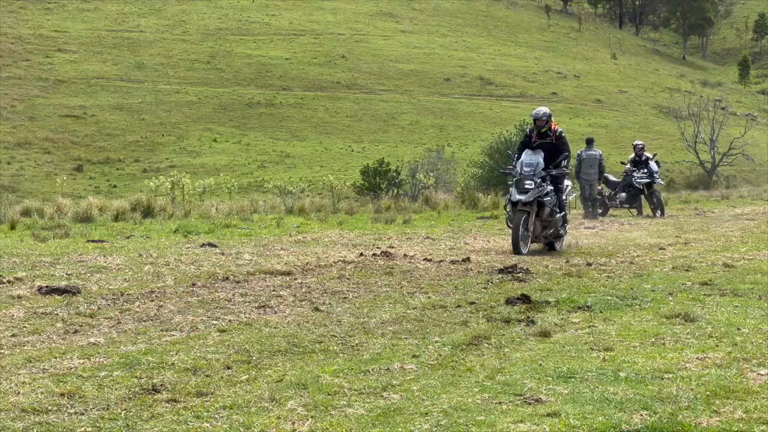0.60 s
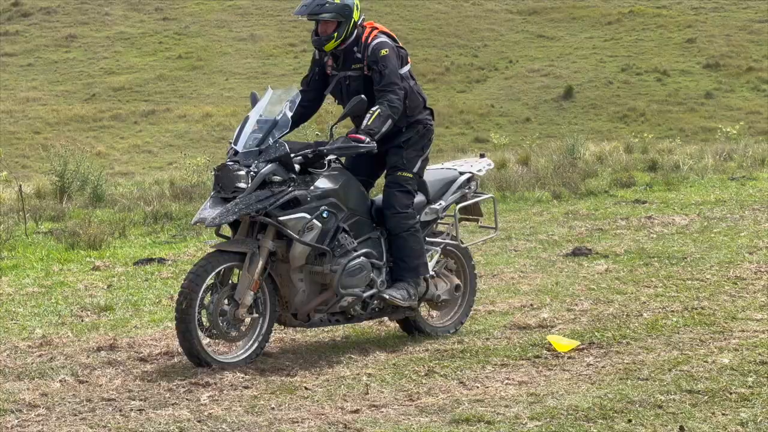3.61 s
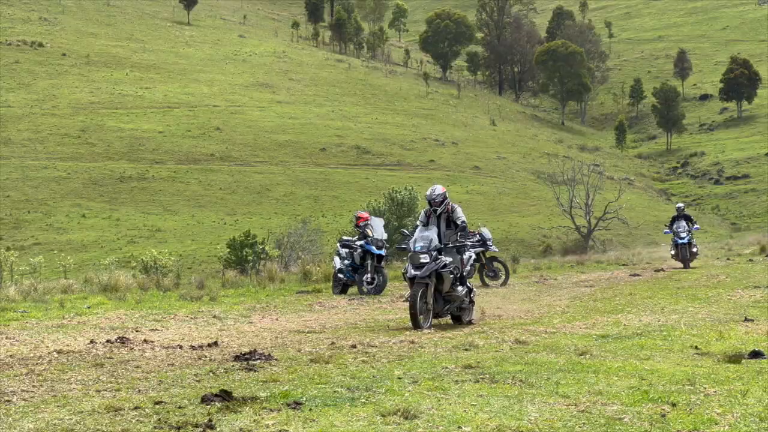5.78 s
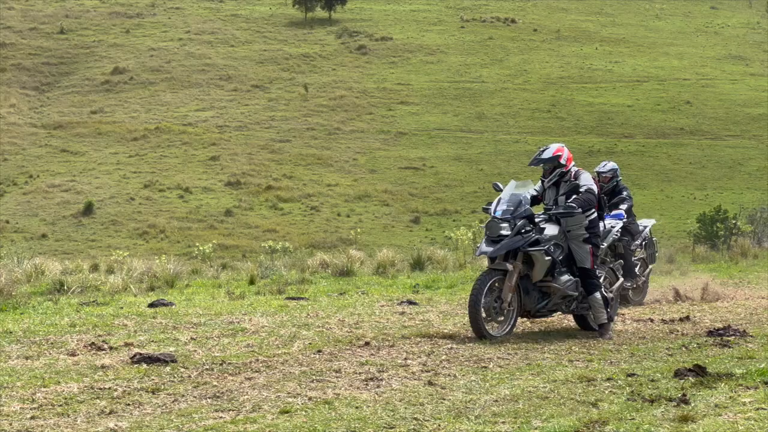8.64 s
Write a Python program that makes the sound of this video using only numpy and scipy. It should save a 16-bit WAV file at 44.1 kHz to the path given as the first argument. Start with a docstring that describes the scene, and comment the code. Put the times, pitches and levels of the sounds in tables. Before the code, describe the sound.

A twin-cylinder motorcycle thuds close to the microphone in an open field, its revs dropping from a quick burst to a low chug. The driveline knocks, valves clatter and gears whine. The rider blips the throttle twice and pulls away. After a brief fade, a second bike drones alongside, stones click under tyres, a brake squeaks and the revs rise again. Other engines rumble in the distance, and very short silences separate four passes.

```python
"""A motorcycle engine thuds close by, its revs falling from a quick burst to a low chug.
Twin-cylinder bikes are doing slow drills on a grass field, in four short passes with silent gaps.
The nearest lugs along with a knocking driveline, blips its throttle and pulls away; others run behind.
Each firing thuds through a silencer, under the clatter of valves and the whine of gears.
Metal rings faintly, small parts ping, and tyres scuff the turf and click on stones."""
import sys
import numpy as np
from scipy import signal
from scipy.fft import rfft, irfft
from scipy.io import wavfile
from scipy.ndimage import uniform_filter1d

SR = 44100
rng = np.random.default_rng(int(sys.argv[2]) if len(sys.argv) > 2 else 0)


def output_pcm(signal):
    """Save a mono or channel-first signal as 16-bit PCM at the path in sys.argv[1].

    Samples are clipped to [-1, 1] before scaling.
    """
    pcm = np.clip(np.atleast_2d(signal).T, -1, 1) * 32767
    wavfile.write(sys.argv[1], SR, np.round(pcm).astype(np.int16))


N = 413658
T = np.arange(N) / SR


# How strongly the silencer lets each pitch through: f/Hz, level/dB
SILENCER = [(18, -47.5), (28, -22), (37, -1.5), (47, 5), (65, 13.5), (85, 8.5), (110, 10), (135, 5.5),
            (160, -3), (190, -14.5), (225, -13.5), (260, -19.5), (320, -23.5), (400, -28), (550, -45.5),
            (3000, -120)]
def exhaust(turns, load, uneven, level_db, boom_top_hz=185, rasp_from_hz=291):
    """Firings ring the nearest bike's silencer; an open throttle adds bark and rasp above its boom."""
    bark_db, others_db, gulp, gulp_turns = np.array(PASSES)[pass_number(), 2:6].T
    # the intake gulps air about half a turn after each firing
    pulses = firings(turns, uneven) + gulp * firings(turns - gulp_turns, uneven)
    near = steadied(chamber(colour(pulses, SILENCER), hz=86, width_hz=140))
    around = other_bikes() + gain_of(-2) * echoes(near, decay_s=0.51, first_s=0.0073)
    pipes = near + gain_of(others_db - 18 * load) * evened(around)  # working hard, it stands out more
    pipes = signal.sosfilt(signal.butter(2, 15, "high", fs=SR, output="sos"), pipes)
    boom = below(pipes, boom_top_hz)
    bark = steadied(pipes - boom)
    # slow, uneven gas flow lingers in the chambers and rounds off each bark
    lingering = gain_of(-1) * uneven / uneven.mean() * echoes(bark, decay_s=0.13)
    bark = steadied(bark + lingering)
    body = below(bark, rasp_from_hz)
    rasp = gain_of(-11.5 + 17.5 * load ** 4) * (bark - body)
    return gain_of(level_db) * (steadied(boom) + gain_of(bark_db + 2 * load ** 2) * (body + rasp))


def firings(turns, uneven):
    """One pulse per engine turn; 'uneven' makes the two cylinders differ and each burn vary."""
    at = np.flatnonzero(np.diff(np.floor(turns)) > 0)
    strength, lag = rng.standard_normal((len(at), 2)).T
    cylinder = (-1) ** np.arange(len(at))
    size = np.exp(uneven[at] * (strength + 0.54 * cylinder))
    place = np.clip(at + .0018 * SR * uneven[at] * lag, 0, len(turns) - 1).astype(int)
    return np.bincount(place, size, len(turns))


# Twists of the throttle (1 Hz is one firing a second; load is how hard the engine works, 0 to 1):
# peak t/s, peak rate/Hz, climb/(Hz/s), sink/(Hz/s), settled rate/Hz, load
THROTTLE_TWISTS = [(0.1, 51.4, 6, 66.3, 26.5, 0.44), (0.72, 42.7, 8.1, 32, 23, 0.04),
                   (1.649, 24.9, 15.2, 6.1, 21.5, 0.07), (3.599, 31.5, 50, 23.9, 21.2, 0.43),
                   (4.079, 36.7, 54, 57.7, 21.2, 0.61), (4.691, 48.6, 88, 18.2, 36.5, 0.84),
                   (6.27, 47.3, 28, 40, 29, 0.64), (6.899, 30, 10, 9.34, 27, 0.2),
                   (8.85, 50.1, 25, 0.85, 48, 0.57), (9.17, 53, 21.4, 24, 47, 0.47)]
def throttle(flywheel_s=0.065, load_lag_s=0.12):
    """Engine speed and load: each twist climbs, then sinks; the heavy flywheel smooths the speed."""
    number = pass_number()
    hz, load = np.array(PASSES)[number, 0], np.zeros(N)
    for s, peak, climb, sink, settled, effort in THROTTLE_TWISTS:
        rev = np.where(T < s, peak - climb * (s - T), np.maximum(peak - sink * (T - s), settled))
        same_pass = number == np.interp(s, T, number).round()
        active = same_pass & ((T >= s) | (rev > hz))
        hz, load = np.where(active, rev, hz), np.where(active, effort, load)
    return smoothed(hz, flywheel_s), np.clip(smoothed(load, load_lag_s), 0, 1)


# The engine in each pass: starting rate/Hz, boom level/dB, bark against boom/dB, other bikes and
# hillside echo against this bike/dB, intake gulp against firing, gulp delay/turns, unevenness (0 to 1)
PASSES = [(26, -21.5, -20.5, 5.5, -0.49, 0.644, 0.19), (21.4, -23, -19, 0.5, -0.41, 0.588, 0.28),
          (21.15, -22, -18.5, -3, -0.29, 0.582, 0.25), (29.7, -26, -19.5, 1.5, -0.39, 0.656, .36)]
# Moments when the low rumble swells: t/s, half length/s, boost/dB
RUMBLE_SWELLS = [(0.054, 0.22, 1.5), (4.16, 0.95, 6), (6.147, 0.3, 1), (7.7, 0.29, 4.5), (9.249, .65, 4.5)]
def boom_level(hz, load):
    """Exhaust level in dB: it grows with speed under load and swells at set moments."""
    start_hz, pass_db = np.array(PASSES)[pass_number(), :2].T
    revving = 5.5 * np.sqrt(load) * np.log2(hz / start_hz)
    swells = sum(db * np.exp(-((T - s) / half_s) ** 2) for s, half_s, db in RUMBLE_SWELLS)
    lumps = 0.6 * (1 - load) * wander(8)  # the rumble swells and sags at light load
    return pass_db + revving + swells + lumps


def chamber(x, hz, width_hz):
    """A chamber delays the tones near its own pitch, drawing each pulse out into a wave."""
    return 2 * signal.lfilter(*signal.iirpeak(hz, hz / width_hz, fs=SR), x) - x


# How loud the clatter and hiss are over time, before speed adds to it: t/s, clatter level/dB, hiss level/dB
CLATTER_HISS_LEVELS = [(0, -49.5, -52), (.63, -50.5, -54.5), (.69, -58.5, -62), (.97, -55, -52),
                       (1.55, -52, -58.5), (2.0, -49, -54), (3.6, -46.5, -51.5), (4.1, -47, -51),
                       (4.45, -46, -50.5), (4.75, -45, -49), (5.0, -46, -51), (5.25, -49.5, -54),
                       (5.68, -50, -54), (5.73, -58.5, -69), (6.28, -56, -58.5), (7.07, -56.5, -60.5),
                       (7.35, -66.5, -76), (8.05, -66.5, -71.5), (8.5, -61.5, -58), (8.92, -69, -67.5),
                       (9.1, -59, -57.5), (9.36, -56, -53)]
# Tone of the clattering case and valves, and of their hiss: f/Hz, level/dB
CLATTER_TONE = [(150, 10), (400, 0), (590, -4.5), (730, 1), (950, 2), (1600, 4.5), (2700, 1.5), (3800, -1),
                (5000, -6), (6500, -5.5), (8000, -12), (16000, -9)]
HISS_TONE = [(2000, -58), (5000, -7.5), (6800, -8), (7300, -1.5), (7900, -7.5), (8800, 0.5), (10200, -23),
             (11200, -1.5), (12200, 1.5), (13200, -3.5), (14500, -14), (16000, -4.5)]
# Whining gear teeth: start t/s, end t/s, multiple of engine speed, width/Hz, level against clatter/dB
GEAR_WHINES = [(1.094, 3.25, 60, 69, -18), (3.15, 4.28, 61, 214, -13.5), (4.48, 5.18, 58, 320, -15),
               (4.93, 5.8, 61.5, 230, -15), (3.8, 4.68, 42, 940, -15.5), (5.4, 6.7, 41.5, 220, -18.5),
               (4.34, 5.3, 22, 217, -18.5), (4.5, 5.38, 16, 150, -22), (8.9, 9.6, 21, 62, -13),
               (9.1, 9.6, 54.5, 330, -7.5), (8.85, 10.2, 62, 5200, -3.5)]
# Faint metallic ringing at fixed pitches: start t/s, end t/s, f/Hz, width/Hz, level against clatter/dB
METAL_RINGS = [(-.2, .8, 2420, 160, -19), (-.1, .8, 1630, 130, -18), (-.1, .45, 1080, 100, -15),
               (0.698, 1.408, 7340, 700, -6), (1.698, 3.301, 7200, 300, -18), (3.2, 4.6, 5596, 480.7, -18),
               (5.801, 6.6, 7220, 381, -11), (6.4, 7.249, 7252, 299, -16)]
def valves_and_gears(turns, hz, idle_hz=21.2, db_per_octave=6.5, tick_turns=0.084):
    """Valves tick twice a turn and shake the case; gears whine in step with the engine; metal rings."""
    clatter_db, hiss_db = curves(CLATTER_HISS_LEVELS) + db_per_octave * np.log2(hz / idle_hz)
    ticks = 1 + 0.54 * np.exp(-(2 * turns % 1) / tick_turns)
    shake = evened(ticks * gain_of(1.21 * wander(200)) * rng.standard_normal(N))

    def ring(start, end, pitch_hz, width_hz, db):
        return during(start, end) * gain_of(db) * evened(resonate(shake, pitch_hz, width_hz))

    whine = sum(ring(start, end, multiple * hz, width, db)
                for start, end, multiple, width, db in GEAR_WHINES)
    ringing = sum(ring(*row) for row in METAL_RINGS)
    flutter = evened(gain_of(5.5 * wander(24)))
    clatter = evened(colour(shake, CLATTER_TONE)) + whine + flutter * ringing
    grit = np.sqrt(ticks) * gain_of(2 * wander(200)) * rng.standard_normal(N)
    hiss = evened(colour(grit, HISS_TONE))
    return gain_of(clatter_db + 1.5) * clatter + gain_of(hiss_db + 3) * hiss


# Knocks in the drive to the back wheel, and one sharp squeak at 4.375 s played the same way: t/s, level/dB,
# treble against that level/dB
KNOCKS = [(1.202, -36, -4), (1.2474, -30.5, 0.5), (1.291, -34, 0), (1.335, -34, 3), (1.651, -36.5, -25),
          (1.853, -35.5, -16), (1.918, -36.5, -7), (2.025, -38, -17), (2.1298, -33, -26),
          (2.1959, -41, -17), (2.341, -38.5, -18), (4.375, -43, -5), (6.794, -43.5, -13), (7.181, -39.5, 0),
          (7.2018, -32.5, 3), (7.2244, -43, -19), (7.2751, -53, -1), (7.3714, -56.5, 0),
          (8.1456, -67, 16.5)]
# Tone of a knock: f/Hz, level/dB
KNOCK_TONE = [(300, -4), (700, 0.5), (1100, -1.5), (1320, 5), (1600, -0.5), (2300, 3.5), (2900, 1.5),
              (3150, 1.5), (3400, 4.5), (3750, 3), (4200, -2), (5000, -4.5), (5830, -4.5), (6500, -13),
              (7200, -2), (10000, -12)]
def knocks():
    """Slack in the driveline snaps shut with a short rattling crunch; one sharp squeak is struck the same way."""
    shape = strike(T[:SR // 8], rise_s=0.00078, fall_s=0.01)
    shape *= gain_of(-2) / shape.max()
    body, treble = np.zeros((2, N))
    for s, db, bright_db in KNOCKS:
        add(body, s, gain_of(db) * shape)
        add(treble, s, gain_of(db + bright_db) * shape)
    return body * noise(KNOCK_TONE) + treble * noise(HISS_TONE)


# Heavy thuds: t/s, f/Hz, level/dB, length/s
THUDS = [(2.338, 95.9, -12, 0.019), (2.643, 188.5, -17, 0.012), (2.657, 70.2, -5.5, 0.046),
         (3.058, 240.5, -28, 0.013), (3.322, 88.5, -9.5, 0.031), (3.327, 190, -22.5, 0.011),
         (6.465, 78.07, -15, 0.071), (7.14, 44.21, -15.5, 0.1)]
def thuds():
    """Short, low thuds and buffets, each one swelling tone."""
    return swelling_tones(THUDS, bend=0.15)


# Brake squeak: t/s, f/Hz, level/dB, length/s
SQUEAKS = [(8.832, 6630, -35.5, 0.087)]
def brake_squeak():
    """A rubbing brake gives one thin, high note."""
    return swelling_tones(SQUEAKS, bend=0.011)


# Small metal parts being struck: t/s, f/Hz, level/dB
PINGS = [(4.377, 5720, -35.5), (4.451, 5640, -41), (4.642, 5650, -38), (8.267, 12130, -37),
         (8.272, 15300, -41), (8.285, 8200, -43), (8.285, 13700, -46), (8.291, 10950, -39),
         (8.291, 5500, -52), (8.397, 9280, -32), (8.406, 5843, -51)]
def pings(rattle=0.36):
    """Struck metal rings briefly and buzzes against its mount."""
    out, t = np.zeros(N), T[:SR // 10]
    shape = strike(t, rise_s=0.00065, fall_s=0.008)
    for s, hz, db in PINGS:
        buzz = evened(resonate(rng.standard_normal(len(t)), hz, width_hz=680))
        add(out, s, gain_of(db) * shape * (np.sin(2 * np.pi * hz * t) + rattle * buzz))
    return out


# Stones under the tyres: t/s, centre f/Hz, level/dB
STONES = [(8.2191, 4200, -50), (8.557, 5765, -43.5), (8.684, 3300, -40.5), (8.729, 5002, -42),
          (8.786, 5900, -62)]
def stones():
    """A stone squeezed out by a tyre gives a short, bright crunch."""
    out, t = np.zeros(N), T[:SR // 10]
    shape = strike(t, rise_s=0.00081, fall_s=0.0059)
    fizz = gain_of(-7) * noise(HISS_TONE)[:len(t)]
    for s, hz, db in STONES:
        crunch = evened(resonate(rng.standard_normal(len(t)), hz, width_hz=4200))
        add(out, s, gain_of(db) * shape * (crunch + fizz))
    return out


# A second bike crossing the field: t/s, firing rate/Hz, level/dB
CRUISE = [(5.699, 41, -30), (6.349, 40.4, -29), (6.948, 43.5, -24), (7.35, 43.1, -26), (7.6, 42.2, -27),
          (8.2, 40.2, -31), (8.6, 40.2, -30), (9.3, 44.3, -33)]
# Tone of its exhaust pipe: f/Hz, level/dB
CRUISE_PIPE = [(20, -40.5), (41, 5), (82, 7), (123, -2), (164, -4), (205, -20.5), (246, -10.5),
               (290, -23.5), (330, -24), (370, -29), (450, -38.5), (560, -49), (3000, -110)]
def cruising_bike(uneven=0.18, waver_db=3, drift=0.0067):
    """A second bike holds a steady throttle; its drone wavers with distance."""
    hz, db = curves(CRUISE)
    turns = np.cumsum(hz * (1 + drift * wander(6))) / SR
    drone = evened(colour(firings(turns, np.full(N, uneven)), CRUISE_PIPE))
    return during(CRUISE[0][0], CRUISE[-1][0]) * gain_of(db + waver_db * wander(5)) * drone


# Brief engine growls: loudest t/s, half length/s, firing rate/Hz, pipe f/Hz, level/dB, unevenness
GROWLS = [(0.551, 0.14, 26.3, 187, -35, 0), (6.66, 0.13, 50, 131, -27.5, 0.22)]
def growls(sag=0.0291):
    """Firings ring a pipe at one pitch, speeding up a little as they swell."""
    out, t = np.zeros(N), T[:SR] - .5
    for s, half_s, rate, pipe_hz, db, uneven in GROWLS:
        swell = np.exp(-(t / half_s) ** 2)
        turns = np.cumsum(rate * (1 - sag * (1 - swell))) / SR
        pulses = firings(turns, np.full(SR, uneven))
        pipe = resonate(np.diff(pulses, prepend=0) + 1e-15, pipe_hz, width_hz=75)
        add(out, s - .5, gain_of(db) * swell * evened(below(pipe, hz=265)))
    return out


# Bikes further off: firing rate/Hz, level/dB
FAR_BIKES = [(37.44, -18.5), (22.17, -11), (19.28, -7.5)]
# Tone of their exhausts: f/Hz, level/dB
FAR_PIPES = [(18, -34), (30, -4), (42, 5), (60, 9), (85, -0.5), (125, -5), (170, -11), (225, -14.5),
             (280, -22.5), (350, -30), (550, -50.5), (3000, -120)]
def other_bikes(drift=.02, uneven=0.32):
    """Three far engines tick over or cruise, and their firings blend into a rumble."""
    all_turns = [np.cumsum(hz * (1 + drift * wander(3))) / SR for hz, db in FAR_BIKES]
    pulses = sum(gain_of(db) * firings(turns, np.full(N, uneven)) / np.sqrt(hz)
                 for turns, (hz, db) in zip(all_turns, FAR_BIKES))
    return evened(colour(pulses, FAR_PIPES))


def echoes(x, decay_s, first_s=0):
    """Dense dying echoes fill the gaps between firings; their pattern shifts as the bike moves."""
    t = T[:int(SR * min(decay_s, .3))]
    tails = rng.standard_normal((2, len(t))) * gain_of(-60 * t / decay_s) * (t >= first_s)
    return steadied(sum(wander(2) * signal.oaconvolve(x, tail)[:N] for tail in tails))


# Tyres scuffing the grass: t/s, length/s, level/dB
SCUFFS = [(0.34, 0.45, -51.5), (1.162, 0.19, -52), (2.743, 0.04, -44), (2.8, 0.018, -45.5),
          (8.649, 0.11, -46.5), (8.677, 0.4, -52)]
# Tone of the scuffed turf, and of the open air: f/Hz, level/dB
TURF_TONE = [(200, -9), (350, 2), (480, -1.5), (800, -12.5), (1500, -19), (4000, -66)]
AIR_TONE = [(200, 3), (450, -2.5), (650, -9.5), (880, 4), (1150, -10.5), (1900, -1.5), (4000, -9),
            (8000, -23.5), (16000, -32)]
def field(air_db=-61.5):
    """Quiet open air, and tyres rubbing over the grass now and then."""
    scuff = np.zeros(N)
    for s, length, db in SCUFFS:
        add(scuff, s, gain_of(db) * np.hanning(int(length * SR)))
    return gain_of(air_db) * noise(AIR_TONE) + scuff * noise(TURF_TONE)


# How left and right differ at each pitch: f/Hz, left's lead/radians, likeness (0 to 1)
LEFT_RIGHT = [(100, 0, .985), (500, 0, .95), (900, .35, .92), (1250, -.2, .96), (1700, 0, .998),
              (2800, 0, .998), (3400, .3, .93), (4500, 0, .998), (8150, 0, .995), (8400, -1, .8),
              (9200, -3.1, .85), (9600, -3.14, .998), (10400, -3.14, .998), (10900, -3.8, .8),
              (12700, -5.8, .9), (12850, -6.28, .998), (14200, -6.28, .998), (14900, -7.5, .55),
              (15800, -9.2, .65)]
def left_and_right(sound):
    """Makes two channels that fall out of step in the treble."""
    f, _, left = signal.stft(sound, SR, nperseg=1024)
    hz, lead, likeness = np.transpose(LEFT_RIGHT)
    scatter = 1.1 * np.sqrt(-2 * np.log(np.interp(f, hz, likeness)))
    phase = np.interp(f, hz, lead)[:, None] + scatter[:, None] * rng.standard_normal(left.shape[::-1]).T
    right = left * np.exp(-1j * phase)
    return signal.istft(np.array([left, right]), SR, nperseg=1024)[1][:, :N]


def swelling_tones(rows, bend):
    """Short swelling tones whose pitch sags as they peak."""
    out = np.zeros(N)
    for s, hz, db, length in rows:
        swell = np.hanning(int(length * SR))
        cycles = np.cumsum(hz * (1 + bend * (1 - swell))) / SR
        add(out, s, gain_of(db) * swell * np.sin(2 * np.pi * cycles))
    return out


def colour(x, tone, size=16384):
    """Gives x a tone from a table, with a filter that rings only after it is struck."""
    hz, db = np.transpose(tone)
    bins_hz = np.fft.rfftfreq(size, 1 / SR)
    gain = gain_of(np.interp(np.log(bins_hz + 1), np.log(hz + 1), db))
    cepstrum = irfft(np.log(gain))
    cepstrum[1:size // 2] *= 2  # moves all the ringing to after the strike
    cepstrum[size // 2 + 1:] = 0
    ringing = irfft(np.exp(rfft(cepstrum)))[:size // 2]
    return signal.oaconvolve(x, ringing)[:N]


def noise(tone):
    """Even noise with the given tone."""
    return evened(colour(rng.standard_normal(N), tone))


def resonate(x, hz, width_hz):
    """Makes x ring at a pitch, which may glide."""
    turn = np.exp(2j * np.pi * np.cumsum(hz * np.ones(len(x))) / SR)
    r = np.exp(-np.pi * width_hz / SR)
    return (turn * signal.lfilter([(1 - r) ** 2], [1, -2 * r, r * r], x / turn)).real


def below(x, hz):
    """The part of a sound under the given pitch."""
    return signal.sosfiltfilt(signal.butter(4, hz, fs=SR, output="sos"), x)


def strike(t, rise_s, fall_s):
    """A level that jumps up and dies away."""
    return (1 - np.exp(-t / rise_s)) * np.exp(-t / fall_s)


def during(start, end, fade_s=0.23):
    """Fades in at start and out at end."""
    return np.clip(np.minimum(T - start, end - T) / fade_s, 0, 1)


def wander(per_s):
    """Random drift, about 1 in size."""
    return evened(np.interp(T * per_s, np.arange(2000), rng.standard_normal(2000)))


def smoothed(x, seconds):
    """A running average."""
    return uniform_filter1d(x, int(seconds * SR), mode="nearest")


def steadied(x, size=5000):
    """Holds the short-term power at 1."""
    power = uniform_filter1d(uniform_filter1d(x ** 2, size), size)
    return x / np.sqrt(abs(power) + 1e-12)


def evened(x):
    """Sets the overall power to 1."""
    return x / np.sqrt(np.mean(x ** 2) + 1e-20)


def gain_of(db):
    """Turns decibels into a multiplier."""
    return 10 ** (np.asarray(db) / 20)


def curves(rows):
    """Joins a table's timed points with straight lines, one curve per column."""
    s, *columns = np.transpose(rows)
    return [np.interp(T, s, column) for column in columns]


def add(mix, s, sound):
    """Mixes a sound in, starting at s seconds."""
    part = mix[max(round(s * SR), 0):][:len(sound)]
    part += sound[:len(part)]


def pass_number():
    """Which pass is running at each moment; they change over in the gaps."""
    return np.searchsorted([(start + end) / 2 for start, end, ramp in GAPS], T)


def scene(sides_db=-18.5):
    """The near bike is straight ahead; echoes and the other bikes' rumble spread a little to the sides."""
    hz, load = throttle()
    level_db = boom_level(hz, load)
    uneven = np.array(PASSES)[pass_number(), -1] * (1 - 0.88 * load)  # hard work steadies the firings
    hz = hz * (1 + 0.0607 * uneven * wander(9))  # the speed wobbles at light load
    turns = np.cumsum(hz) / SR
    low = exhaust(turns, load, uneven, level_db) + cruising_bike() + growls() + thuds()
    high = valves_and_gears(turns, hz) + knocks() + pings() + stones() + brake_squeak() + field()
    around = echoes(low, decay_s=.3, first_s=0.00804) + other_bikes()
    side = gain_of(level_db + sides_db) * steadied(around)
    return left_and_right(high) + np.array([low + side, low - side])


# Silent gaps between the passes: start t/s, end t/s, ramp/s
GAPS = [(.636, .688, .018), (2.732, 2.755, .003), (5.67, 5.73, .022)]
def record(dry, fade_s=0.4, top_hz=15830):
    """The sound drops out between passes, fading into the last gap; the highest treble is cut."""
    heard = np.prod([(1 - during(*gap)) ** 2 for gap in GAPS], axis=0)
    to_last_gap_s = (GAPS[-1][0] + GAPS[-1][1]) / 2 - T
    fade = np.where(to_last_gap_s > 0, np.clip(to_last_gap_s / fade_s, 0, 1) ** 0.77, 1)
    treble_cut = signal.firwin(511, top_hz, window=("kaiser", 9), fs=SR)
    return signal.oaconvolve(dry * fade * heard, treble_cut[None], "same")


dry = scene()
out = record(dry)
output_pcm(out)
```